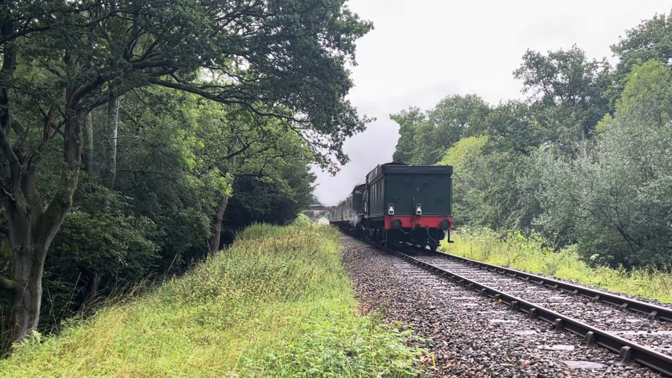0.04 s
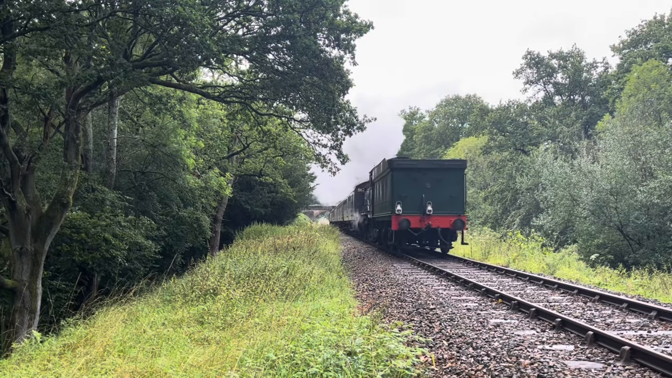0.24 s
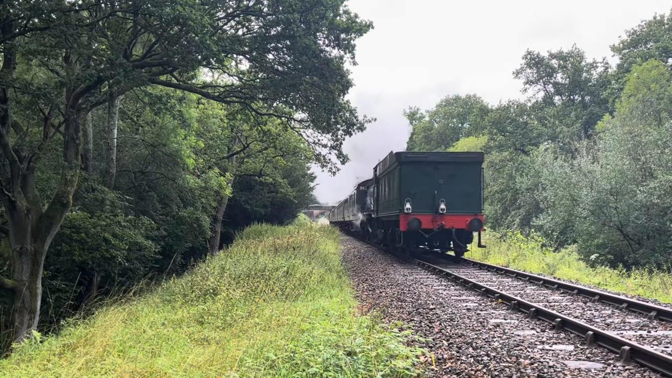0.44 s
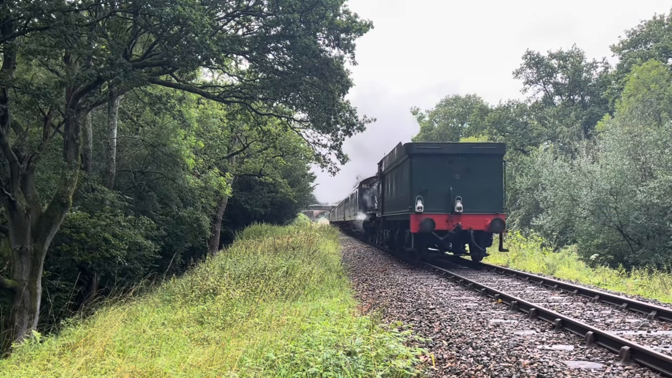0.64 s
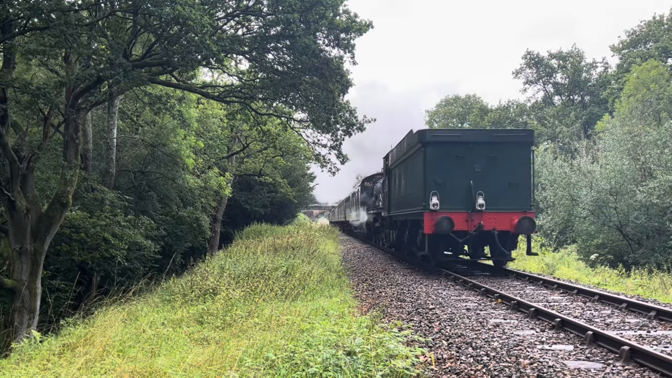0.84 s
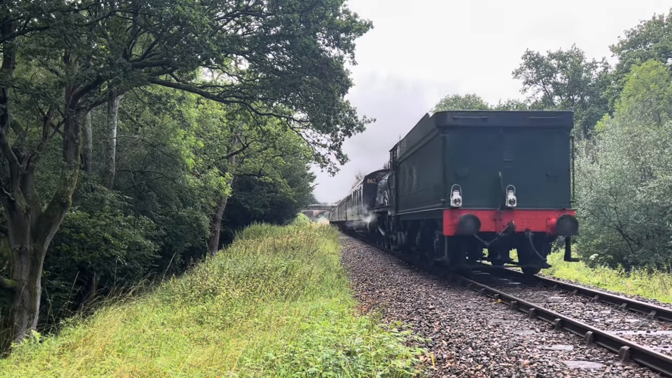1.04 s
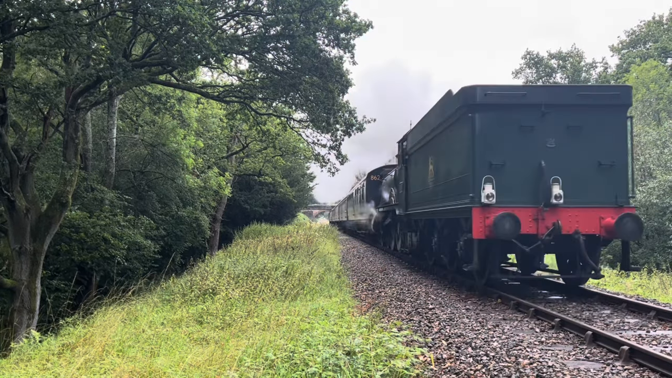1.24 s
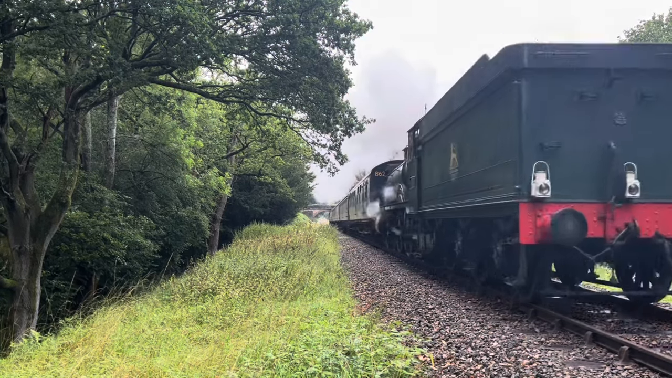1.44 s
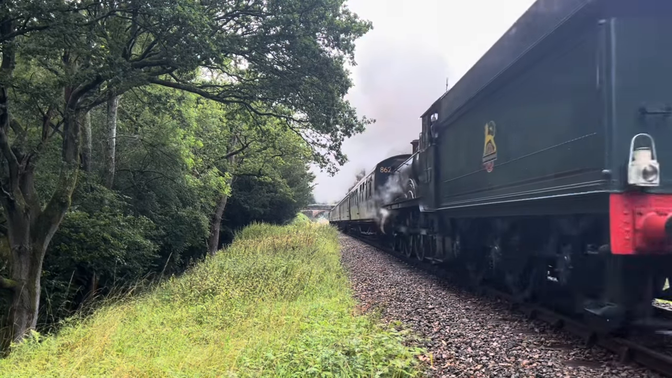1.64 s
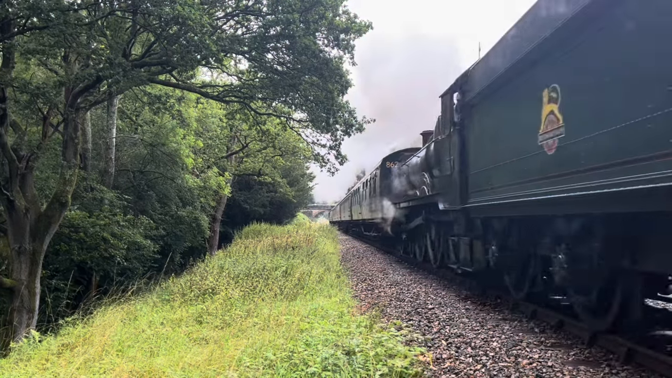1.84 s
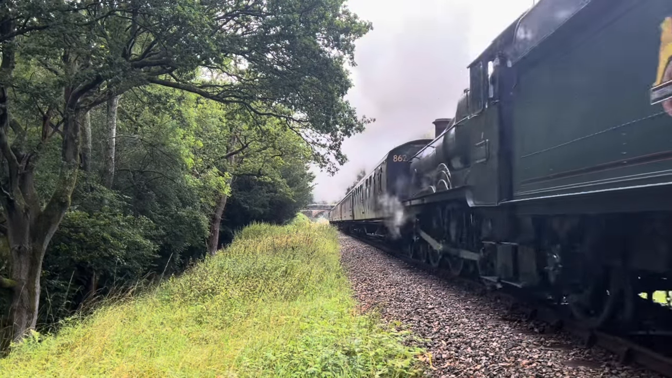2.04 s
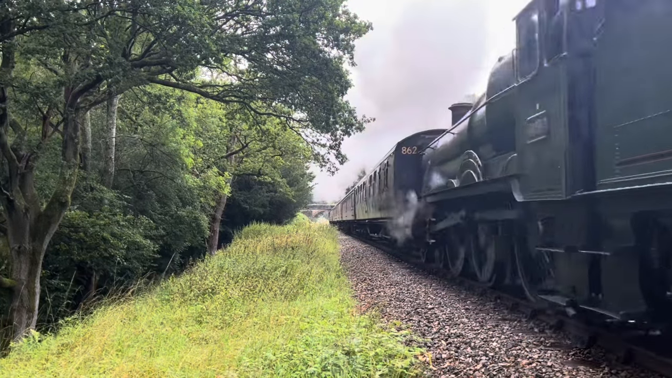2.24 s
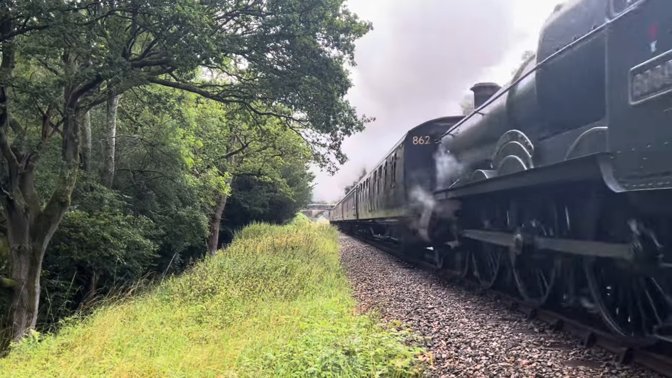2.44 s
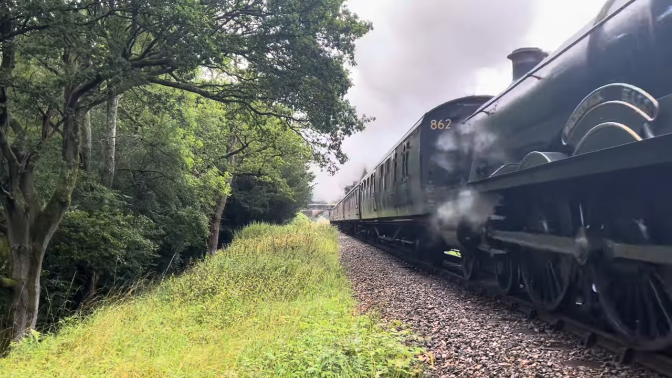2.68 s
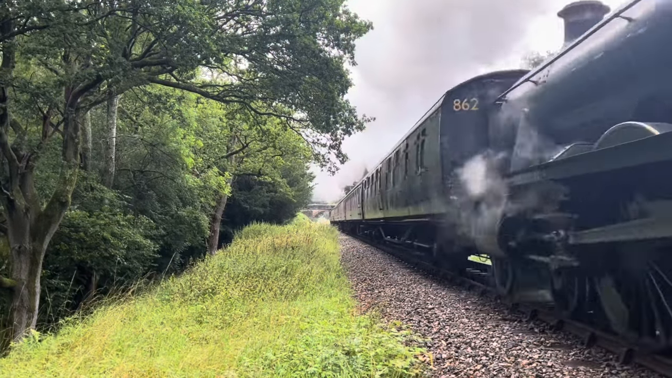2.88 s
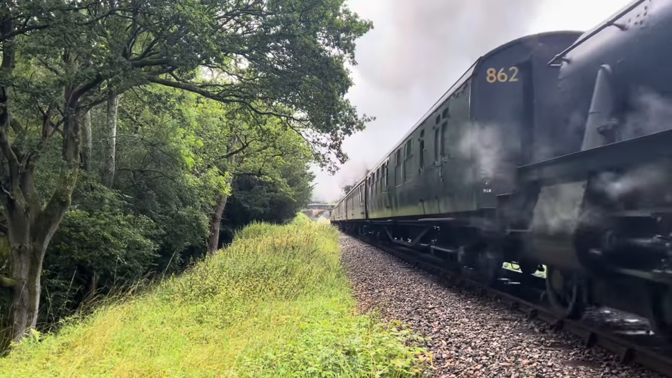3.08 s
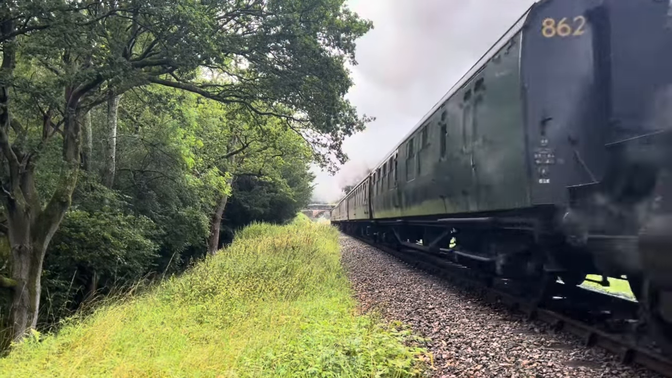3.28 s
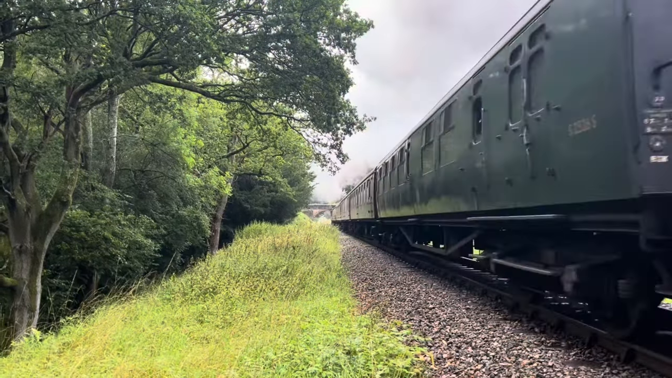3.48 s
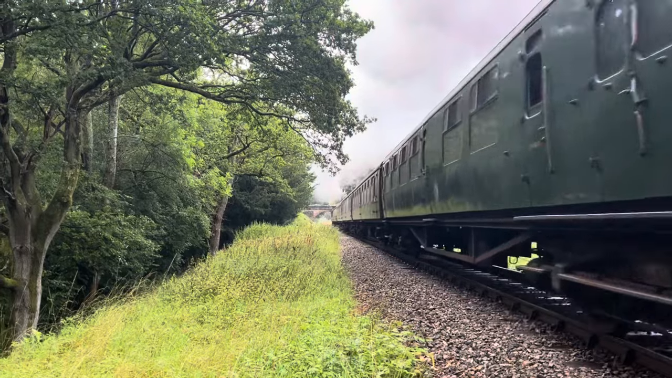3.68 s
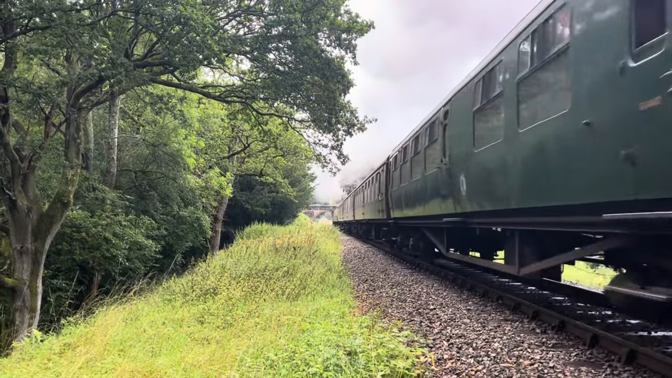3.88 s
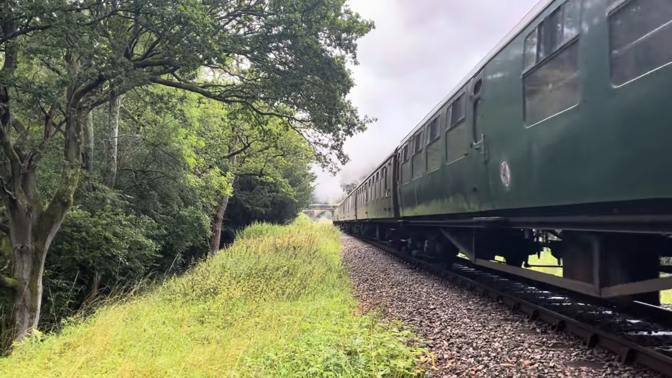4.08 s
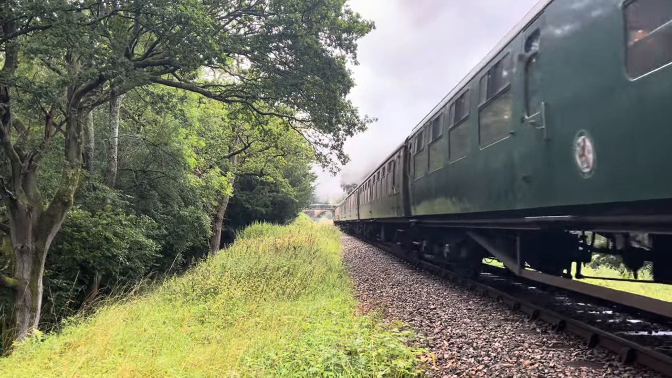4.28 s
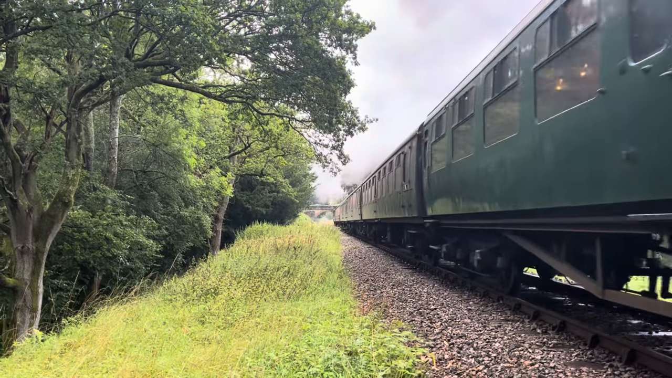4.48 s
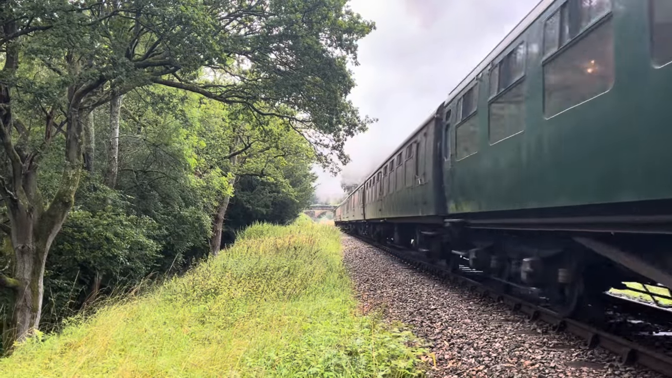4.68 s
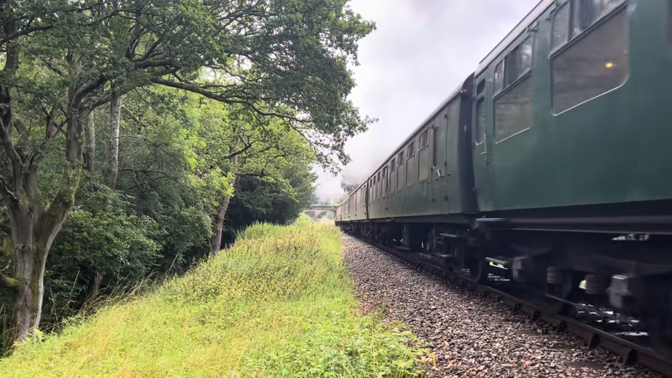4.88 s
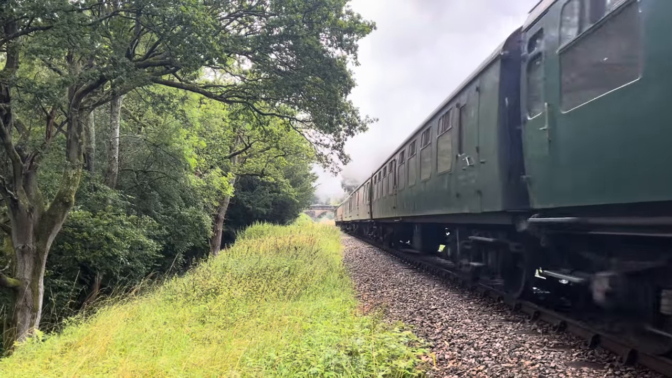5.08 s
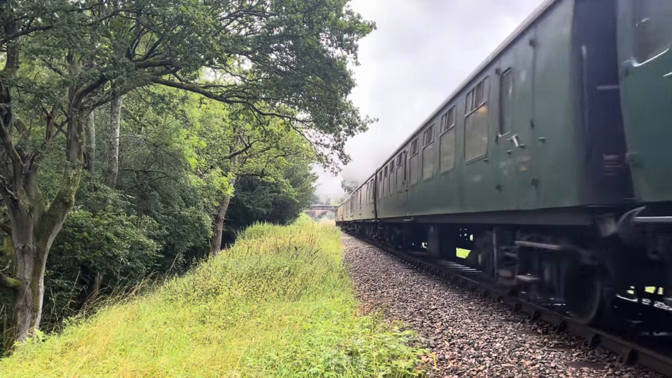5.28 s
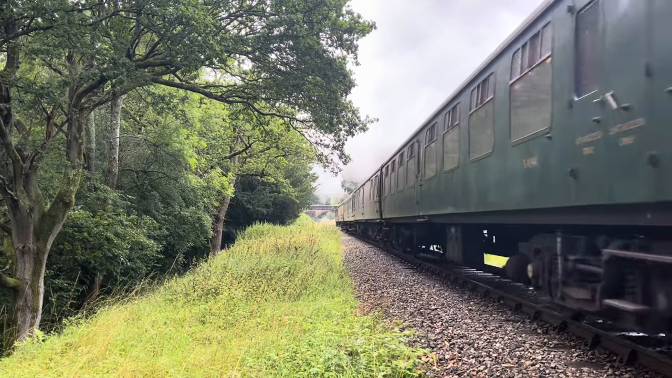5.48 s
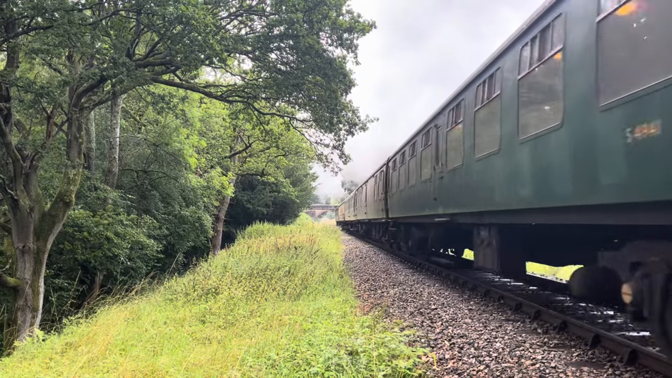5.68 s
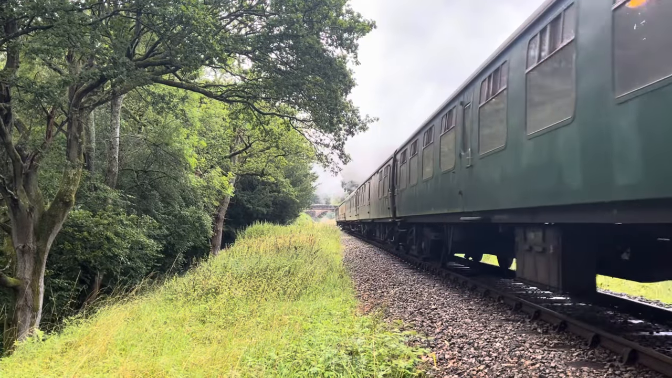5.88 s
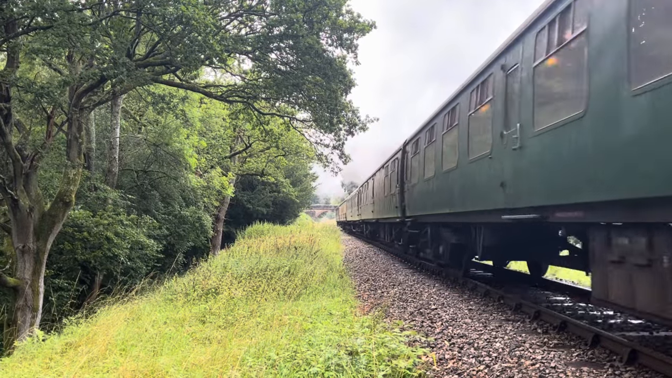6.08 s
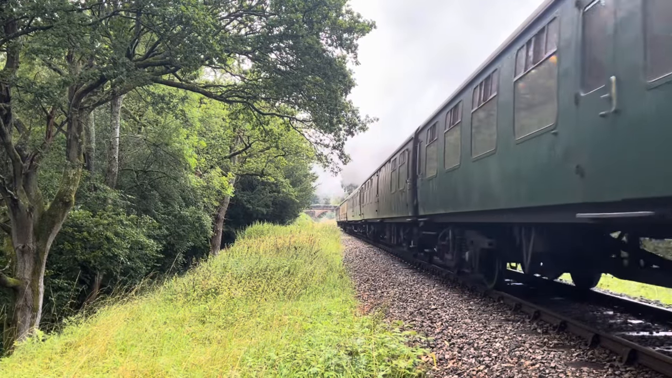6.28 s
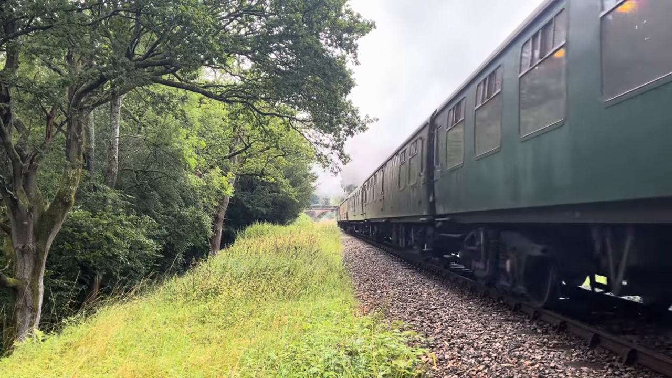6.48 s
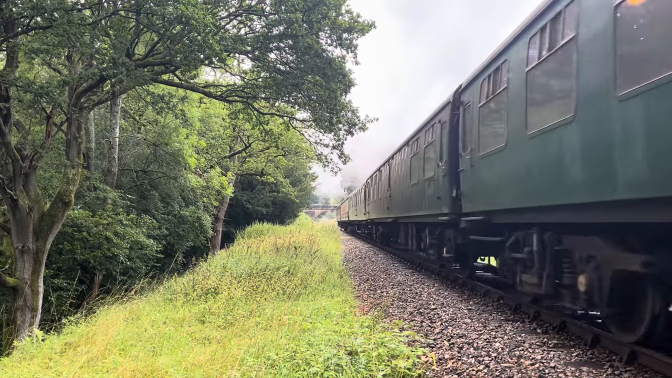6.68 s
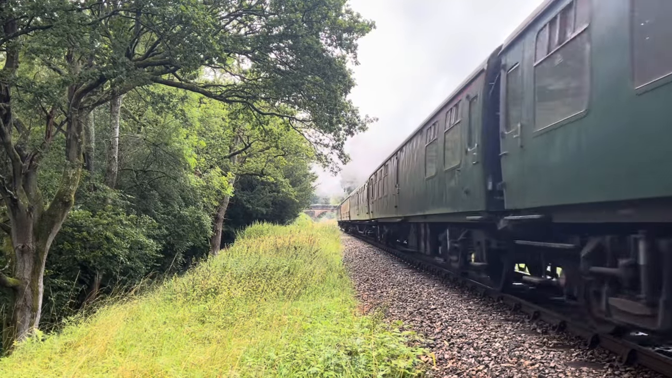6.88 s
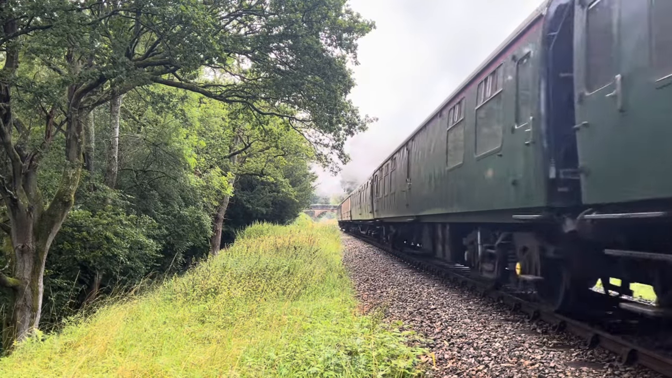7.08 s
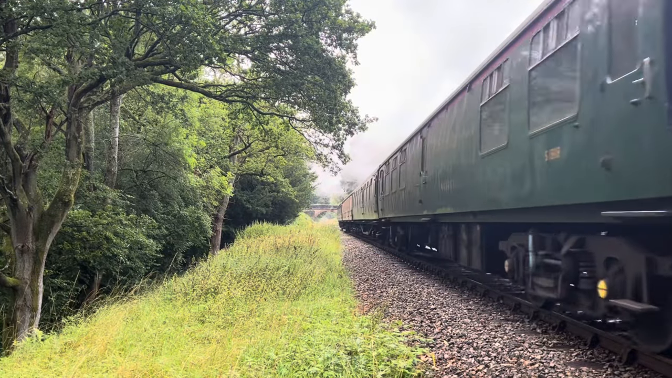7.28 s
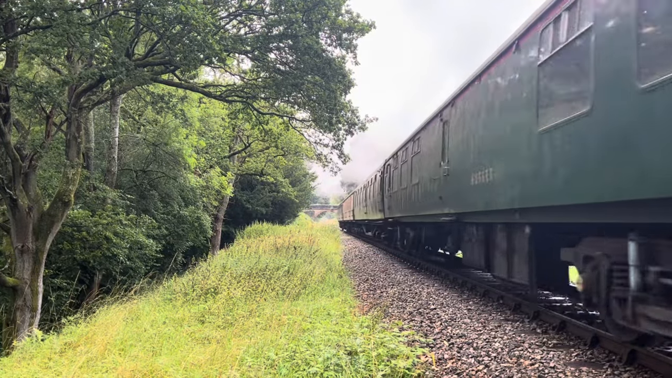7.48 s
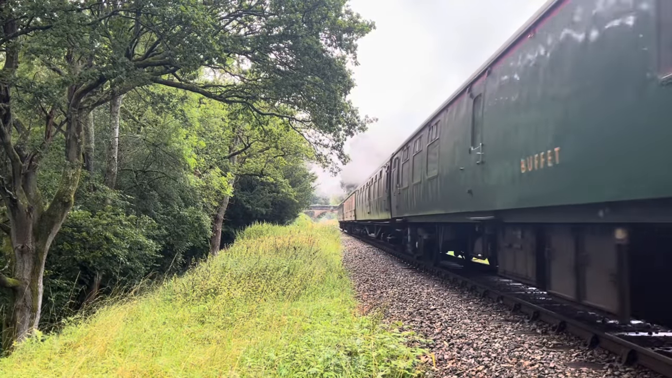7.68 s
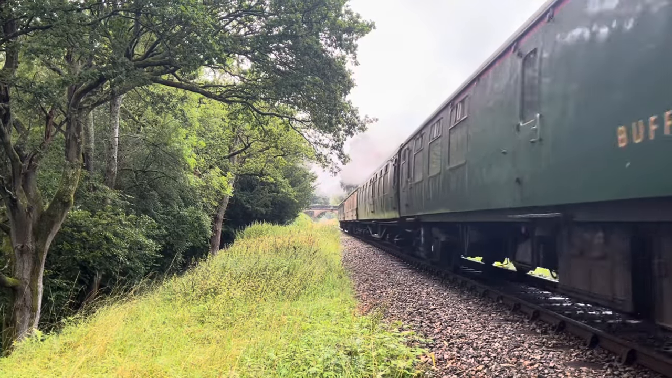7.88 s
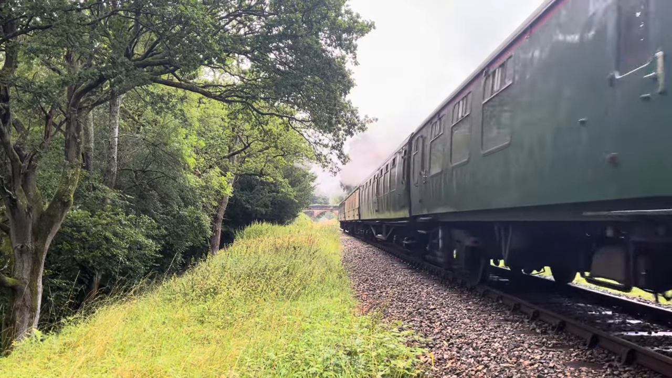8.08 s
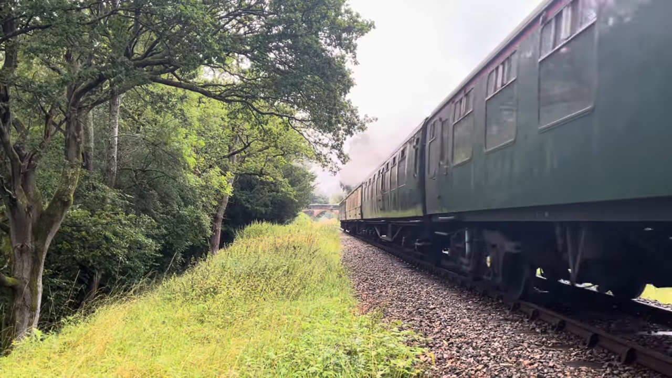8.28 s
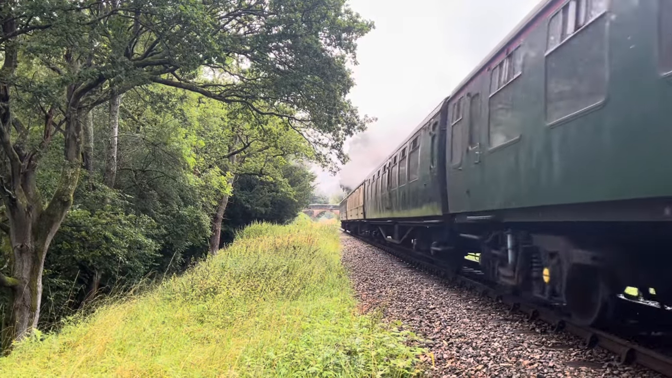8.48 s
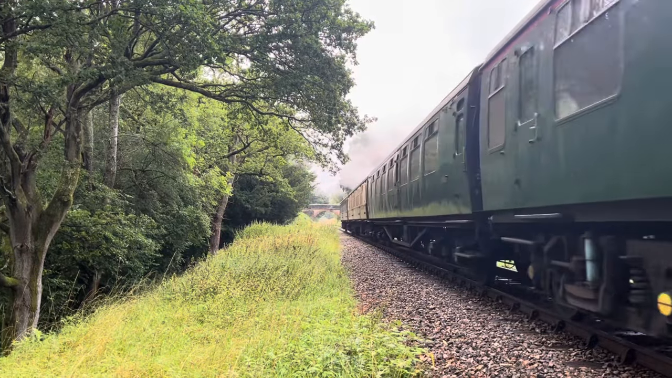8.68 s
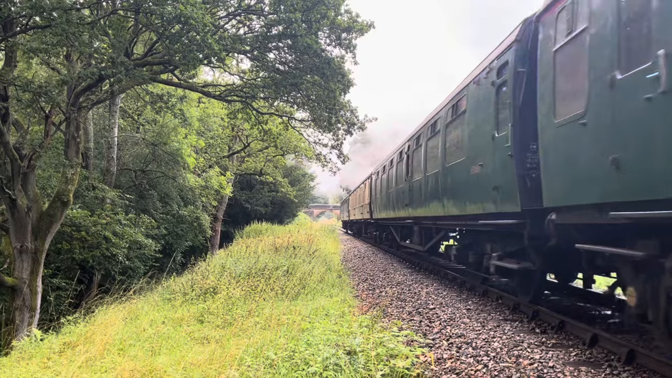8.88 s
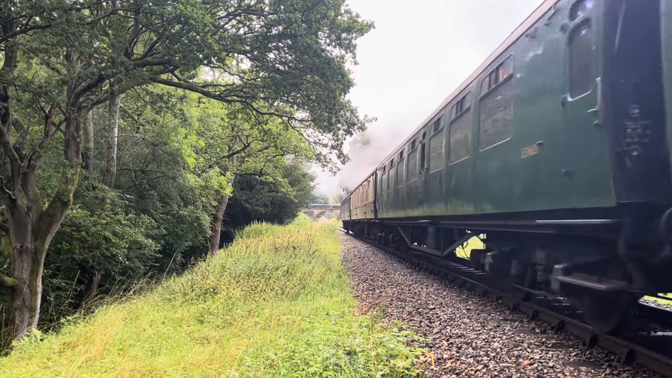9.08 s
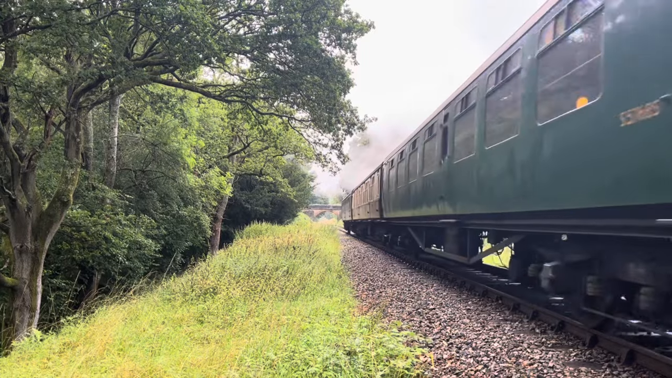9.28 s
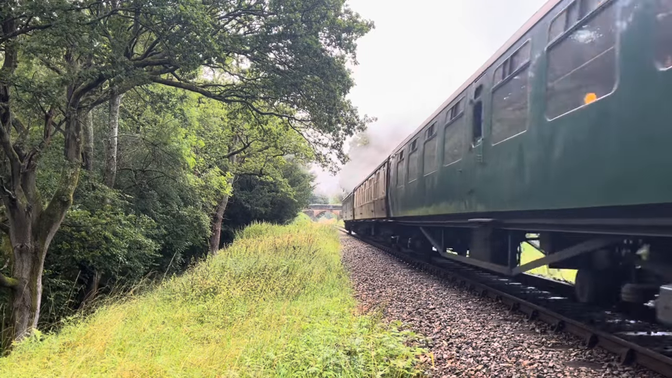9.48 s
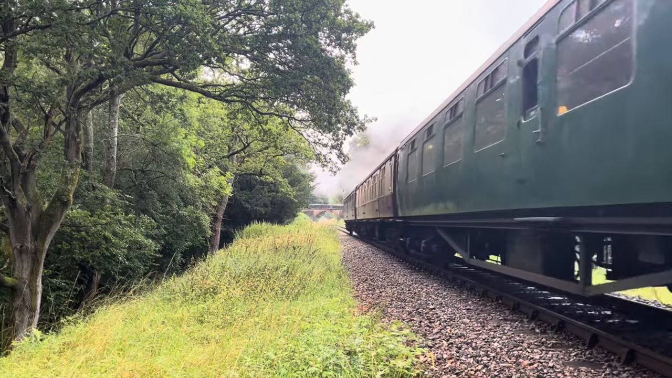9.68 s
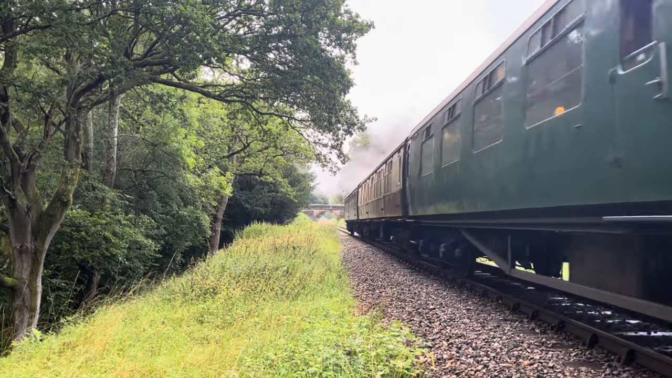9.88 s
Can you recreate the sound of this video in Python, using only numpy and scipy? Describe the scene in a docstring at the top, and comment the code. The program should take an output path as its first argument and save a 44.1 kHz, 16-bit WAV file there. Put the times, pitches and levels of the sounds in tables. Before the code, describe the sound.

A steam train passes very close on jointed track in a wood. From 0 s, fast, uneven, deep chuffs, about eight a second, approach over low rolling rumble and thin leaking hiss. Three heavy clacking thuds land around 0.7, 0.9 and 1.1 s, with a faint squeal. From 1.3 to 3.9 s the engine sweeps past: chuffs swell to a hollow, forceful roar, rods knock rapidly, steam puffs sharply and spits whistling bursts near 2.3 s. The exhaust weakens after 4 s and is gone by 5 s. Coaches then roll by steadily, with paired wheel blows near 4.1-4.4, then clusters of four around 5.5-6.3, 7.3-8.1 and 9.2-10 s. Between them are droning rumble, steel roll, bright ticks and a brief squeal around 5.6 s. Trees return short crack echoes. Wide stereo, close and slightly saturated, deepest bass thinned; the coaches are still passing at the end.

```python
"""In a wood, beside jointed track: a steam engine and its coaches roll past. Exhaust puffs ring the chimney and
leaking steam hisses as shaped noise; rods knock as the engine passes. Then each axle strikes a rail joint,
ringing wheel and track modes above the roll of steel wheels. The stereo image turns from the train ahead to the
train abreast."""
import sys
import numpy as np
from scipy import signal
from scipy.fft import rfft, irfft
from scipy.io import wavfile

SR = 44100
rng = np.random.default_rng(int(sys.argv[2]) if len(sys.argv) > 2 else 0)


def unload_wav(signal):
    """Save mono or channel-first audio to the path in sys.argv[1] as 16-bit WAV at rate SR, clipped to [-1, 1]."""
    wavfile.write(
        sys.argv[1],
        SR,
        np.round(np.clip(np.atleast_2d(signal).T, -1, 1) * 32767).astype(np.int16),
    )


def elevation(decibels):
    """Turn decibel levels (scalar or array-like) into linear amplitude ratios."""
    levels = np.asarray(decibels, float)
    return 10 ** (levels / 20)


N = 438354
HZ = np.maximum(np.fft.rfftfreq(N, 1 / SR), 1)
FIRST_COACH_S = 4.0   # joint blows before this belong to the tender

# exhaust beats: (time [s], peak level [dB], chimney pitch [Hz])
EXHAUST_BEATS = [(0.07, -29, 98), (0.192, -10, 73.4), (0.326, -6, 106), (0.457, -11, 72), (0.578, -14, 145),
                 (0.774, -24, 90), (0.98, -15, 118), (1.095, -9, 88), (1.199, -11, 182), (1.422, -7, 88.8),
                 (1.552, -6.5, 310), (1.643, -17, 91), (1.839, -8, 75.4), (1.979, -8, 194),
                 (2.089, -11, 83.4), (2.211, -3, 170), (2.327, -1.5, 119), (2.468, -4, 88), (2.55, -4, 189),
                 (2.765, -4.5, 145), (2.832, -0.5, 71.6), (2.952, -9, 358), (3.086, -2.5, 120),
                 (3.204, -1.5, 193), (3.303, -5.5, 140), (3.356, -4, 201), (3.452, -2, 189),
                 (3.6, -1.5, 173), (3.729, -4.5, 180), (3.865, -7, 140), (3.988, -3.5, 174),
                 (4.114, -5.5, 177), (4.253, -10, 164), (4.375, -6, 110), (4.522, -11, 162),
                 (4.659, -16, 159), (4.779, -18.5, 160)]
# steady steam leak from the engine: (time [s], level [dB])
STEAM_LEAK = [(0.0, -44), (0.5, -42), (0.95, -42), (1.35, -38), (2.1, -38), (2.4, -36.5), (2.65, -45),
              (3.3, -43), (3.8, -49), (4.1, -47.5), (4.3, -51), (5.2, -55.5), (6.5, -77)]
# puffs of steam from the cylinders: (time [s], length [s], level [dB])
CYLINDER_PUFFS = [(0.595, .05, -51), (0.97, .06, -47), (1.85, 0.034, -45), (2.052, 0.085, -38),
                  (2.182, 0.025, -38), (2.3, 0.018, -34), (2.485, 0.059, -46), (2.58, 0.016, -44),
                  (2.685, 0.032, -37), (2.947, 0.13, -42), (3.075, 0.035, -37.5), (3.187, 0.014, -27),
                  (3.328, 0.054, -42), (3.441, 0.074, -35), (3.54, 0.11, -41), (3.702, .02, -39)]
# whistling spits of steam: (time [s], length [s], peak level [dB])
STEAM_SPITS = [(2.07, .04, -27), (2.29, .055, -17), (2.37, .05, -21), (3.33, .12, -30), (3.9, .1, -33)]
# tones within each spit: (frequency [Hz], width [Hz], level [dB])
SPIT_WHISTLES = [(4720, 35, -8), (5800, 150, -11), (6250, 90, -10.5), (8300, 250, -7), (10670, 170, -10)]
# tender and coach wheels over the rail joint:
# (time [s], clack level [dB], thud peak level [dB], thud pitch [Hz])
JOINT_BLOWS = [(0.6594, -11, -2, 123), (0.8725, -11, -2.5, 111), (1.0873, -20, -3, 117),
               (4.1457, -24, -6.5, 145), (4.3716, -16, -3.5, 113), (5.4615, -21, -3.5, 267),
               (5.69, -16.5, -1.5, 120), (6.017, -19.5, -0.5, 245), (6.2566, -15.5, -3, 310),
               (7.3339, -17, -2, 133), (7.5693, -14, -0.5, 105), (7.893, -16, 0, 108),
               (8.1342, -16, -3.5, 105), (9.207, -14, .5, 263), (9.4487, -12.5, -3, 143),
               (9.7741, -14.5, 0, 253), (10.015, -6.5, -3, 130)]
# knocks of the engine's rods and driving wheels:
# (time [s], clack level [dB], crack over clack [dB], thud peak level [dB], ring peak level [dB])
ROD_KNOCKS = [(1.2895, -22, -15, -11, -32), (1.6961, -20.5, -8, -22, -19), (1.861, -37, 11, -18, -39),
              (1.951, -20, -3, -10, -20), (2.1948, -8, -8, -30, -15), (2.2092, -29, -1, -18, -28),
              (2.332, -10, -17, -28, -16), (2.448, -14.5, -35, -11, -21), (2.5457, -13.5, -30, -3, -29),
              (2.7, -9.5, -16, -19, -25), (2.76, -15.5, -18, -1, -26), (2.9526, -12.5, -23, -4.5, -15),
              (2.966, -17, -40, -15, -40), (3.0799, -13.5, -21, -0.5, -44), (3.1915, -27.5, 9, -12, -32),
              (3.205, -9.5, -31, -22, -40), (3.2995, -17.5, -26, -1, -30), (3.4708, -16, -11, -10, -29),
              (3.5027, -17, -19, -3, -35), (3.6559, -16, -15, -3, -23), (3.7242, -14, -21, -7.5, -24),
              (3.8552, -14.5, -9, -6.5, -34)]
# wheel and rail modes, levels before the brightness tilt: (frequency [Hz], width under rolling [Hz],
# level under rolling [dB], level after a blow [dB], 60 dB decay time [s])
WHEEL_MODES = [(1310, 160, 1, 5, .2), (1390, 130, -1, 4, .2), (1800, 220, -7, -1, .18),
               (2060, 160, -12, -5, .18), (2430, 180, -9, -2, .2), (2620, 200, -11, -4, .18),
               (3130, 220, -12, -7, .18), (3750, 300, -17, -12, .15), (4350, 200, -19, -8, .22),
               (4500, 160, -19, -6, .25), (5050, 160, -21, -8, .2), (5180, 160, -23, -10, .2)]
# sleeper and bogie modes struck at a joint, levels before pitch weighting:
# (frequency [Hz], level [dB], 60 dB decay time [s])
TRACK_MODES = [(74, -2.5, 0.2), (110, 10.5, 0.12), (145, 7, 0.16), (203.3, 3, 0.25), (271.2, 10.5, 0.1),
               (353.7, -0.5, 0.29), (481.4, -2.5, 0.12), (620, -23, 0.3)]
# rolling level of the engine's running gear as it nears and leaves: (time [s], level [dB])
ENGINE_ROLL = [(0.0, -24), (0.3, -23.5), (1.13, -19.5), (1.52, -14), (1.74, -17), (2.24, -15),
               (2.54, -20.5), (2.82, -21), (3.0, -19), (3.51, -19.5), (3.8, -21), (4.26, -26), (4.45, -38),
               (4.7, -36), (5.3, -32.5), (6.0, -40)]
# light ticks of wheels at rail ends: (time [s], peak level [dB], pitch [Hz])
RAIL_TICKS = [(0.6394, -38, 2650), (0.848, -25, 2950), (4.03, -22, 3970), (4.6004, -28, 3060),
              (5.675, -25, 2870), (5.8481, -30, 2600), (5.9154, -25.5, 2980), (6.237, -25, 3110),
              (6.4775, -32, 2650), (6.8694, -37, 2840), (7.5534, -24, 2650), (7.7925, -25.5, 2510),
              (8.1183, -23, 2670), (8.3439, -27.5, 3700), (8.7394, -33, 2880), (9.433, -20.5, 2550),
              (9.6594, -24, 3140)]
# wheel squeals: (time [s], length [s], pitch [Hz], peak level [dB])
FLANGE_SQUEALS = [(0.703, 1, 1950, -29.5), (1.628, 0.1, 3400, -30), (1.762, 0.15, 3360, -32),
                  (2.761, 0.17, 1856, -24), (4.146, 0.14, 1700, -33), (4.14, 0.037, 1264, -13),
                  (5.331, 0.32, 2460, -37), (5.573, 0.19, 1313, -21.5)]

# noise spectra, relative within each: (frequency [Hz], level [dB per Hz])
HISS_SPECTRUM = [(500, -17), (1000, -19), (2000, -29), (4000, 16), (7000, 19.5), (11000, 15), (14000, 10),
                 (16000, -8)]      # steam jet
CLACK_SPECTRUM = [(400, 16.5), (900, 9.5), (1800, 3.5), (2800, -11), (3600, -15), (5000, -103)]    # body of a blow
CRACK_SPECTRUM = [(2500, 13), (4000, 5.5), (5500, -8), (7000, -5.5), (9000, -6), (12000, -17), (16000, -22)]    # bright edge of a blow
RUMBLE_SPECTRUM = [(20, -38), (35, -23.5), (55, -8.5), (75, -10), (110, -14.5), (160, -13), (250, -24)]  # lowest rolling layer
DRONE_SPECTRUM = [(80, -40), (140, -5), (190, -5.5), (320, -1.5), (500, -9), (750, -13.5), (1100, -25),
                  (1600, -52)]    # middle rolling layer
ROLL_SPECTRUM = [(500, -74), (900, 1.5), (1600, -1.5), (2500, -5.5), (3300, -8), (4200, -11.5), (6000, -19),
                 (8000, -18), (12000, -30.5), (16000, -33)]      # upper rolling layer

# stereo image: (frequency [Hz], phase by which right leads [rad], left over right [dB], likeness [0-1])
IMAGE_AHEAD = [(30, .08, .4, 1.0), (90, .17, .4, 1.0), (250, .45, .1, .98), (430, .5, .6, .93),
               (600, .9, -1.0, .6), (780, .2, -3.0, .2), (1200, 1.5, -2.2, .25), (1600, 1.3, -3.0, .45),
               (1750, -.1, 1.5, .9)]       # lower range, sound from ahead
IMAGE_ABREAST = [(30, .12, 1.0, 1.0), (90, .27, 1.1, 1.0), (250, .7, .6, .98), (380, .9, 1.5, .94),
                 (520, 1.6, 5.0, .8), (750, 3.0, 1.5, .82), (1300, 3.1, -5.2, .87), (1600, 3.3, -4.0, .8),
                 (1700, 6.0, 1.0, .93)]   # lower range, sound from abreast
IMAGE_TREBLE = [(2300, -.5, -1.2, .91), (3100, -.5, 2.0, .78), (3700, -.8, 4.0, .35),
                (4300, -1.2, 1.0, .68), (5100, -.3, -2.0, .65), (5700, 1.0, .5, .65), (6600, 1.2, 1.2, .68),
                (7400, 2.2, .5, .72), (7750, 3.14, 0.0, 1.0), (8900, 3.14, 0.0, 1.0), (9400, 4.2, 0.0, .68),
                (10600, 5.4, 0.0, .68), (11100, 6.28, 0.0, 1.0), (13100, 6.28, 0.0, 1.0),
                (13700, 7.5, 0.0, .5), (14400, 9.42, 0.0, 1.0)]     # both directions, phase before whole turns are added; at the flat steps of likeness 1 the sides are pure sum or difference


def exhaust():
    """Resonance: each beat is a puff of turbulence that excites the chimney's pitch and broader tones above."""
    out = np.zeros((2, N))
    for s, db, hz in EXHAUST_BEATS:
        age = np.arange(int(.25 * SR)) / SR / .052   # in units of 52 ms
        puff = rng.standard_normal((2, len(age)))
        boom = rms_one(twice_resonant(puff, hz, 72))
        breath = rms_one(resonance(resonance(puff, 5.2 * hz, 560), 1.97 * hz, 220))
        rasp = rms_one(resonance(puff, 730, 820))
        swell = age * np.exp(-(1.58 * age) ** 2)
        add(out, s, db, swell * (boom + elevation(-12.0) * breath + elevation(-25.0) * rasp))
    return out


def steam():
    """Jet noise: turbulent flow hisses, flutters and puffs; a valve spits narrow whistles."""
    attack_s, release_s = 0.0041, 0.016
    flutter_db, sputter_db = 1.5, 0.5
    leak_db, = in_time(STEAM_LEAK)
    flow, t = elevation(leak_db), np.arange(SR // 2) / SR
    for s, length_s, db in CYLINDER_PUFFS:
        at = int(s * SR)
        opening = np.minimum(t / attack_s, 1)
        closing = np.exp(-np.maximum(t - length_s, 0) / release_s)
        flow[at:at + len(t)] += elevation(db) * opening * closing
    unsteadiness = elevation(flutter_db * drift(9.3) + sputter_db * drift(98))
    out = flow * unsteadiness * noise(HISS_SPECTRUM)
    for s, length_s, db in STEAM_SPITS:
        jet = rng.standard_normal((2, SR // 5))[:, :int(length_s * SR)]
        whistle = sum(elevation(tone_db) * rms_one(resonance(jet, hz, width_hz))
                      for hz, width_hz, tone_db in SPIT_WHISTLES)
        add(out, s, db, np.hanning(jet.shape[1]) * whistle)
    return out


def joints_and_knocks():
    """Impact excitation: a wheel dropping over the gap, or a rod knocking, sets wheel and track modes ringing."""
    coach_bright_db, tender_bright_db = -10, -6.5   # crack over clack
    wheel_ring_db, knock_thud_hz = -17.5, 160
    clatter_db = 1.6   # raggedness of the clack
    wheels = []
    for s, clack_db, thud_db, thud_hz in JOINT_BLOWS:
        bright_db = coach_bright_db if s > FIRST_COACH_S else tender_bright_db
        if s < N / SR:
            wheels.append((s, clack_db, bright_db, thud_db, wheel_ring_db, thud_hz))
    rods = [(*row, knock_thud_hz) for row in ROD_KNOCKS]
    s, clack_db, bright_db, thud_db, ring_db, thud_hz = np.transpose(wheels + rods)
    count = len(wheels)

    wheel_clack = bursts(s[:count], clack_db[:count], rise_s=.0005, t60=.09)
    rod_clack = bursts(s[count:], clack_db[count:], rise_s=0.00038, t60=0.13)
    clack_tail = bursts(s, clack_db - 13.0, rise_s=0.0013, t60=0.35)
    clack = noise(CLACK_SPECTRUM) * elevation(clatter_db * drift(99)) * (wheel_clack + rod_clack + clack_tail)
    first_crack = bursts(s, clack_db + bright_db, rise_s=0.00047, t60=0.061)
    tree_echo = bursts(s, clack_db + bright_db - 11, rise_s=.01, t60=.4)   # the trees throw the crack back
    out = clack + noise(CRACK_SPECTRUM) * (first_crack + tree_echo)

    for when, wheel_db, track_db, centre_hz in zip(s, ring_db, thud_db, thud_hz):
        jar = rng.standard_normal((2, int(.4 * SR)))
        add(out, when, wheel_db, struck_wheels(jar))
        add(out, when, track_db, struck_track(jar, centre_hz))
    return out


def struck_wheels(jar):
    """Modal ringing: the axle's two wheels, slightly mistuned, answer a blow and the chatter after it."""
    t = np.arange(jar.shape[1]) / SR
    rattle = jar * (np.exp(-t / .004) + .4 * np.exp(-t / .045))
    wheels = 0
    for hz, _, _, db, t60 in WHEEL_MODES:
        for _ in range(2):
            mode_db = db + wheel_tilt(hz, 1.0) + 4 * rng.standard_normal()
            mode_hz = hz * (1 + .01 * rng.standard_normal())
            wheels = wheels + elevation(mode_db) * ring(rattle, mode_hz, t60)
    return wheels


def struck_track(jar, centre_hz):
    """Modal ringing: modes near the thud's pitch answer most, and the deepest are driven last."""
    t = np.arange(jar.shape[1]) / SR
    track = 0
    for hz, db, t60 in TRACK_MODES:
        push = jar * t * np.exp(-t * hz / 0.67)
        octaves_off = abs(np.log2(hz / centre_hz))
        track = track + elevation(db - 1.75 * octaves_off) * ring(push, hz, t60) * hz ** 1.78
    return track


def rolling():
    """Roughness excitation: steel on steel shakes track, coach bodies and wheels; wheel tones come and go."""
    # level against the engine, share of its swing, level beside a coach axle,
    # and how far past the joint an axle is loudest
    rumble_gain = rolling_gain(engine_offset_db=0.5, swing_share=1.0, axle_db=-26.5, loudest_m=3)
    drone_gain = rolling_gain(engine_offset_db=-4.5, swing_share=1.35, axle_db=-26, loudest_m=0.8)
    roll_gain = rolling_gain(engine_offset_db=-13, swing_share=0.85, axle_db=-42.5, loudest_m=0.1)
    song_gain = rolling_gain(engine_offset_db=-29, swing_share=0.75, axle_db=-43, loudest_m=0.8)
    rumble = elevation(2.2 * drift(9)) * noise(RUMBLE_SPECTRUM)
    drone = elevation(2.2 * drift(14)) * noise(DRONE_SPECTRUM)
    roll = elevation(1.5 * drift(25)) * noise(ROLL_SPECTRUM)
    roughness, song = rng.standard_normal((2, N)), 0
    for hz, width_hz, db, *_ in WHEEL_MODES:
        tone = rms_one(twice_resonant(roughness, hz, width_hz))
        song = song + elevation(db + wheel_tilt(hz, 1.5) + 2.8 * drift(5)) * tone
    return rumble_gain * rumble + drone_gain * drone + roll_gain * roll + song_gain * song


def rolling_gain(engine_offset_db, swing_share, axle_db, loudest_m):
    """Incoherent addition: the powers of engine and coach axles sum; the gain is the root."""
    engine_db, = in_time(ENGINE_ROLL)
    mean_db = -20   # pivot of the engine's swing
    engine = elevation(mean_db + engine_offset_db + swing_share * (engine_db - mean_db))
    return np.sqrt(engine ** 2 + elevation(axle_db) ** 2 * axles_near(loudest_m))


def axles_near(loudest_m):
    """Inverse-square law: each coach axle's power swells as it passes, louder clacks counting for more."""
    speed_m_s, track_m = 13.5, 3.12   # train speed, distance to the rail
    far_coaches_db = -5.5             # steady floor from coaches still to come
    t, power = np.arange(0, N, 64) / SR, 0
    s, clack_db, *_ = np.transpose([row for row in JOINT_BLOWS if row[0] > FIRST_COACH_S])
    for when, weight_db in zip(s, clack_db - clack_db.mean()):
        along_m = speed_m_s * (t - when) - loudest_m
        power = power + elevation(weight_db) / (1 + (along_m / track_m) ** 2)
    return np.interp(np.arange(N) / SR, t, power) / 2 + elevation(far_coaches_db) ** 2


def ticks_and_squeals():
    """Contact and friction: light touches clink high; a slipping flange sings a narrow wavering tone."""
    out, t = np.zeros((2, N)), np.arange(SR) / SR
    for s, db, hz in RAIL_TICKS:
        touch = rng.standard_normal((2, SR // 10)) * np.exp(-t[:SR // 10] / 0.011)
        add(out, s, db, resonance(touch, hz, 600) + elevation(-21.0) * resonance(touch, 3100, 700))
    for s, length_s, hz, db in FLANGE_SQUEALS:
        slip = resonance(rng.standard_normal((2, SR)), hz, 33)
        add(out, s, db, slip * np.minimum(t / 0.0083, 1) * np.exp(-(t / length_s) ** 4))
    return out


def rms_one(x):
    """Normalization: scales to unit power."""
    return x / np.sqrt(np.mean(x ** 2) + 1e-20)


def in_time(rows):
    """Linear interpolation: curve columns at every sample."""
    s, *columns = np.transpose(rows)
    return [np.interp(np.arange(N) / SR, s, column) for column in columns]


def over_hz(rows):
    """Interpolation on a log frequency axis: table columns at every FFT bin."""
    hz, *columns = np.transpose(rows)
    return [np.interp(np.log(HZ), np.log(hz), column) for column in columns]


def noise(spectrum):
    """Spectral shaping: two unrelated draws, the direct path and what trees and ballast scatter."""
    level_db, = over_hz([(10, -200)] + list(spectrum) + [(SR / 2, -200)])
    white = rng.standard_normal((2, N))
    return rms_one(irfft(rfft(white) * elevation(level_db), N))


def drift(rate):
    """Low-passed chance: a slow random curve of spread 1, cut off near rate [Hz]."""
    hop, settle = 40, 2000   # samples per slow step, slow steps dropped at the start
    r = np.exp(-2 * np.pi * rate * hop / SR)
    chance = rng.standard_normal(N // hop + settle + 2)
    slow = signal.lfilter([1], [1, -2 * r, r * r], chance)[settle:]
    return np.interp(np.arange(N) / hop, np.arange(len(slow)), rms_one(slow))


def resonance(x, hz, width_hz):
    """Damped resonator: a two-pole peak of gain 1."""
    r = np.exp(-np.pi * width_hz / SR)
    poles = [1, -2 * r * np.cos(2 * np.pi * hz / SR), r * r]
    return signal.lfilter([(1 - r * r) / 2, 0, (r * r - 1) / 2], poles, x)


def twice_resonant(x, hz, width_hz):
    """Cascaded resonators: two equal peaks in series give steeper skirts."""
    return resonance(resonance(x, hz, width_hz), hz, width_hz)


def wheel_tilt(hz, db_per_octave):
    """Spectral tilt: brightness of the wheel tones in dB above the lowest mode."""
    return db_per_octave * np.log2(hz / WHEEL_MODES[0][0])


def ring(x, hz, t60):
    """Impulse response of a mode: a unit click starts a decaying sine of height 1."""
    r, w = elevation(-60 / (t60 * SR)), 2 * np.pi * hz / SR
    return signal.lfilter([0, np.sin(w)], [1, -2 * r * np.cos(w), r * r], x)


def bursts(times, dbs, rise_s, t60):
    """Exponential decay: an envelope that rises quickly at each time and dies away."""
    clicks = np.full(N, 1e-18)
    np.add.at(clicks, (np.asarray(times) * SR).astype(int), elevation(dbs))
    fall, rise = elevation(-60 / (t60 * SR)), np.exp(-1 / (rise_s * SR))
    dying = signal.lfilter([1], [1, -fall], clicks)
    return signal.lfilter([1 - rise], [1, -rise], dying)


def add(out, s, db, sound):
    """Superposition: lays both draws in at a time, the direct one's peak at the given level."""
    at = int(s * SR)
    scaled = elevation(db) * sound / np.abs(sound[0]).max()
    out[:, at:at + sound.shape[1]] += scaled[:, :N - at]


def scene():
    """Superposition of all sources as direct and scattered sound at the lineside."""
    return exhaust() + steam() + joints_and_knocks() + rolling() + ticks_and_squeals()


def stereo_image(dry, bass):
    """Stereo image: the two sides differ in phase and level; scattered sound lowers their likeness."""
    turns = 2 * np.pi * round(bass[-1][1] / (2 * np.pi))   # keeps the phase continuous into the treble
    treble = [(hz, lead + turns, db, alike) for hz, lead, db, alike in IMAGE_TREBLE]
    lead, balance_db, alike = over_hz(list(bass) + treble)
    alike = np.clip(alike, 0, 1)
    direct, scattered = rfft(dry) * np.sqrt([(1 + alike) / 2, (1 - alike) / 2])
    left = (direct + scattered) * elevation(balance_db / 2)
    right = (direct - scattered) * elevation(-balance_db / 2) * np.exp(1j * lead)
    return irfft(np.array([left, right]), N)


def roll_off(x):
    """The treble ends steeply here."""
    return signal.sosfilt(signal.butter(12, 15800, fs=SR, output="sos"), x)


def record(dry):
    """Linear pickup, then saturation: the image turns from ahead to abreast, loses deep bass, rounds its peaks."""
    abreast = np.interp(np.arange(N) / SR, [2.16, 2.39], [0, 1])   # the engine swings past [s]
    pair = (1 - abreast) * stereo_image(dry, IMAGE_AHEAD) + abreast * stereo_image(dry, IMAGE_ABREAST)
    bass_cut = signal.butter(N=4, Wn=42, btype="high", fs=SR, output="sos")
    pair = signal.sosfilt(bass_cut, pair)
    ceiling = 1.02
    return roll_off(ceiling * np.tanh(pair / ceiling))


dry = scene()
out = record(dry)
unload_wav(out)
```